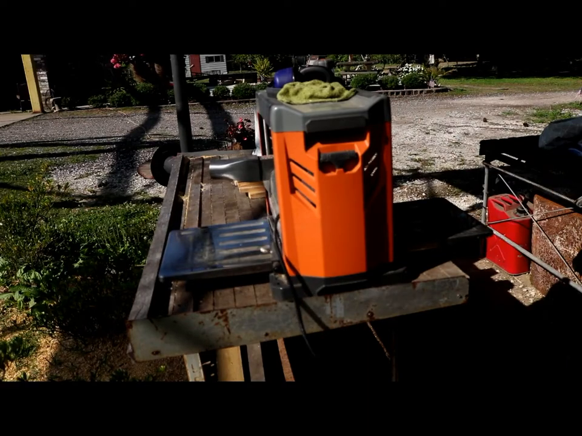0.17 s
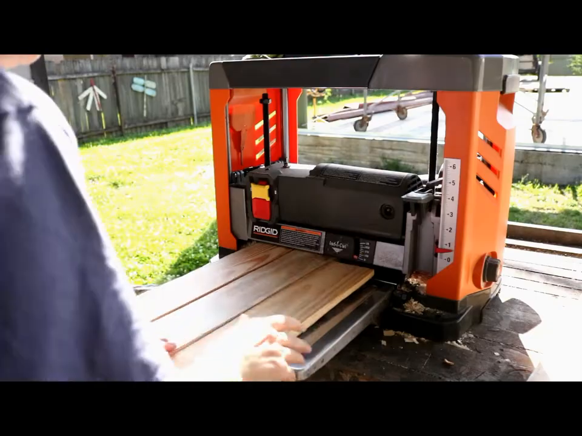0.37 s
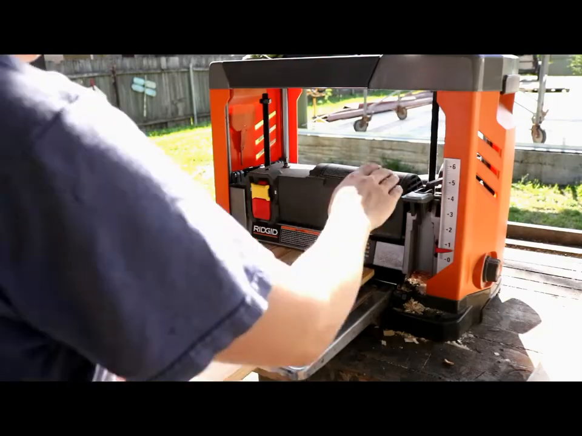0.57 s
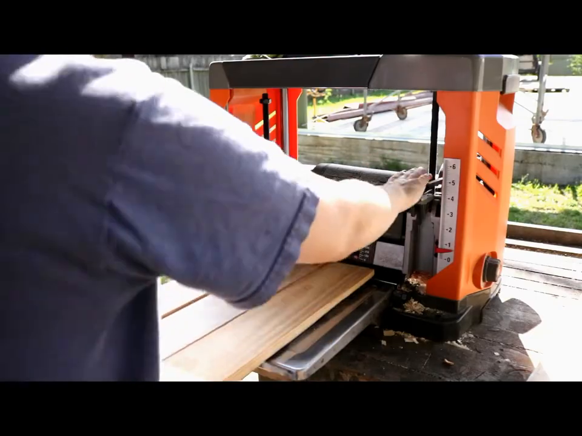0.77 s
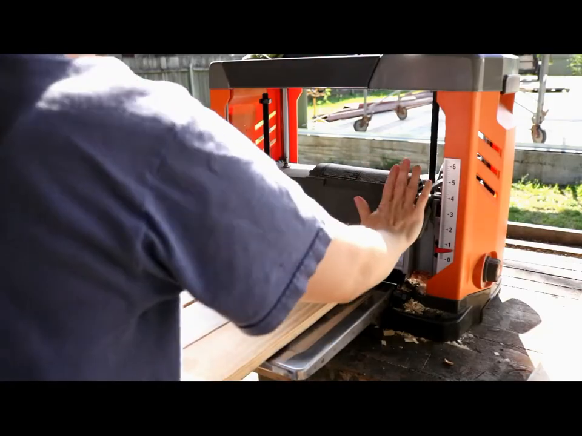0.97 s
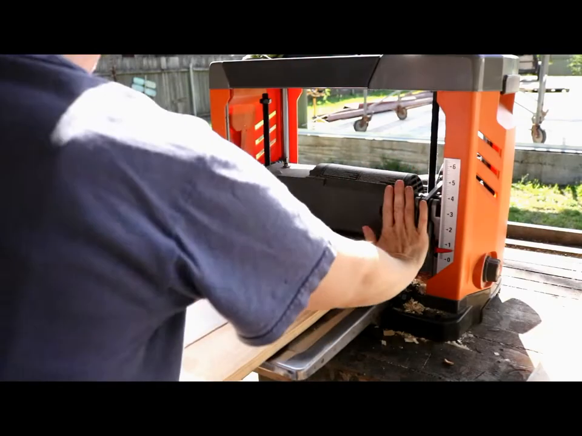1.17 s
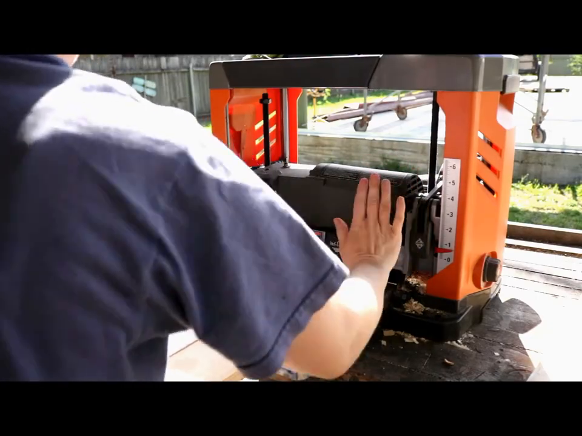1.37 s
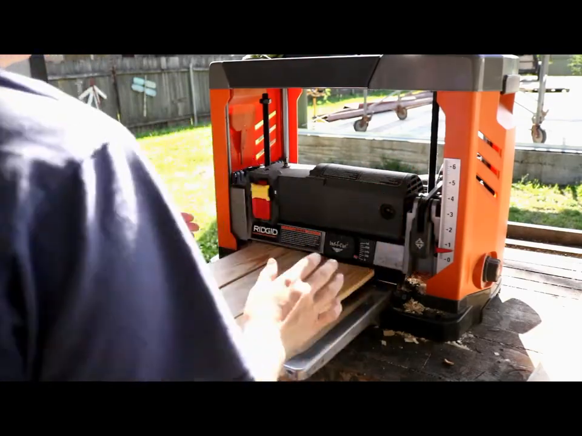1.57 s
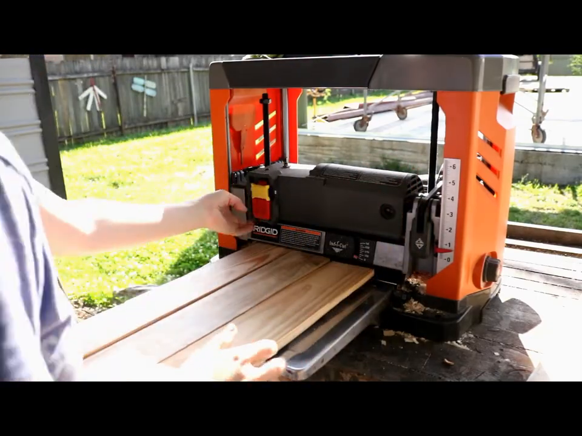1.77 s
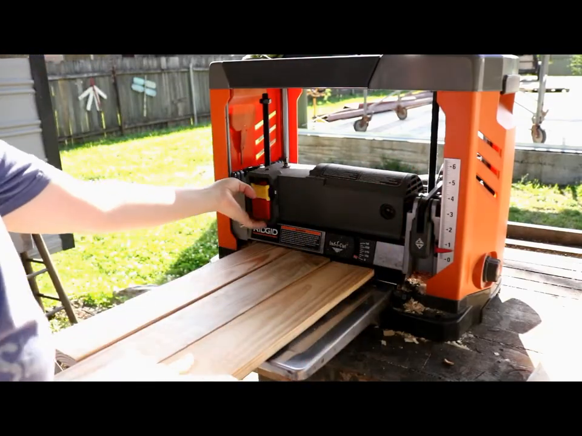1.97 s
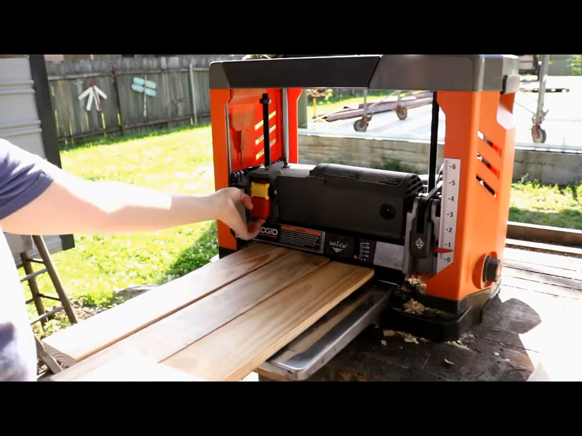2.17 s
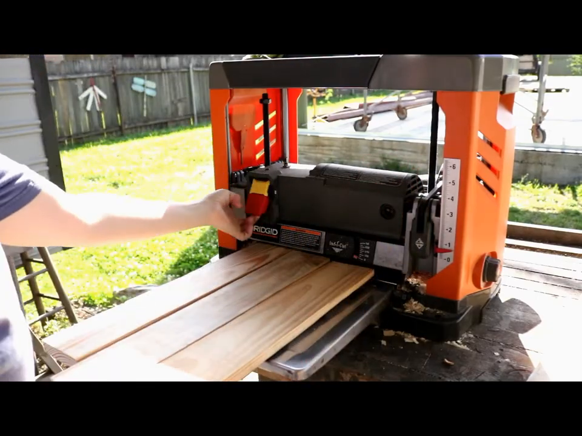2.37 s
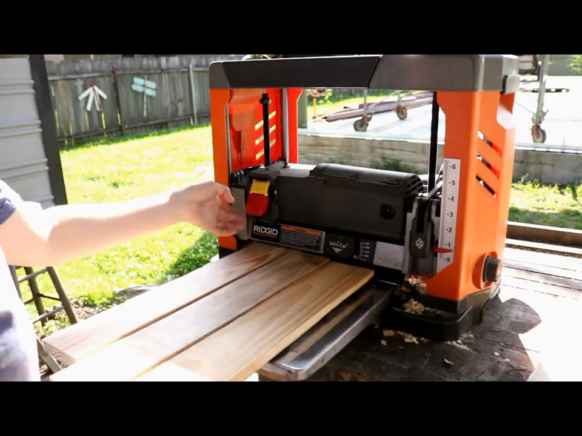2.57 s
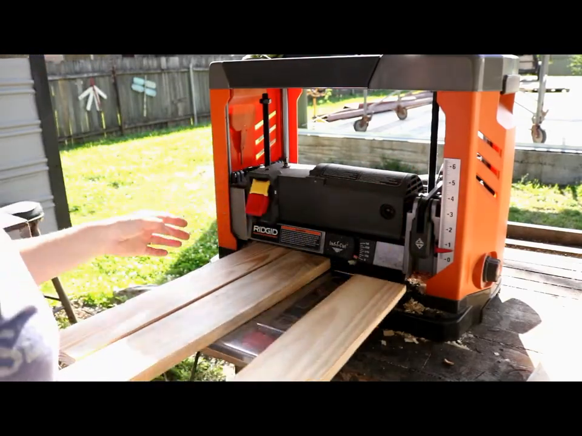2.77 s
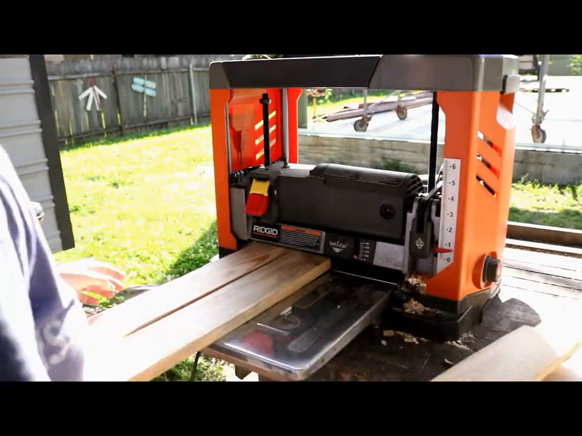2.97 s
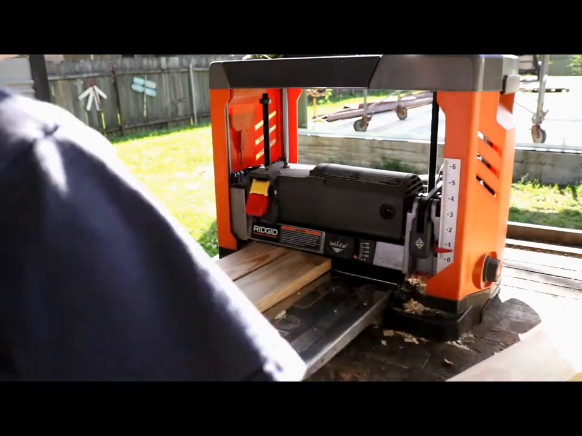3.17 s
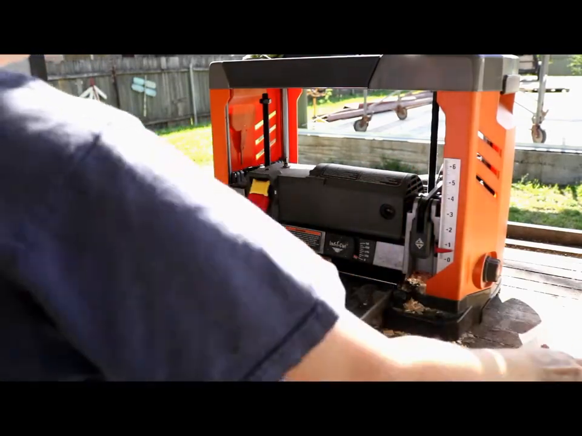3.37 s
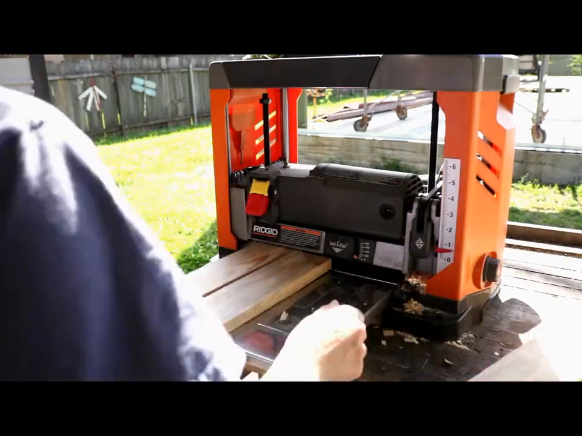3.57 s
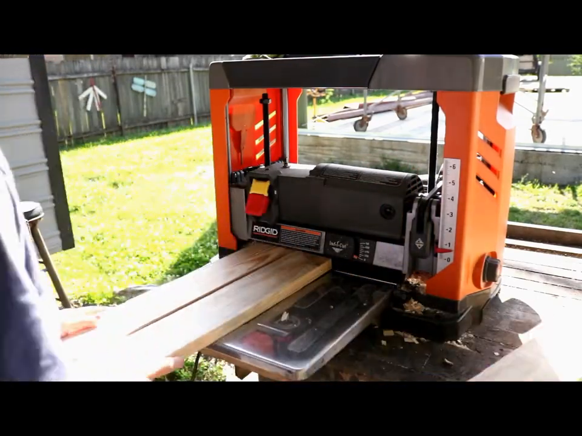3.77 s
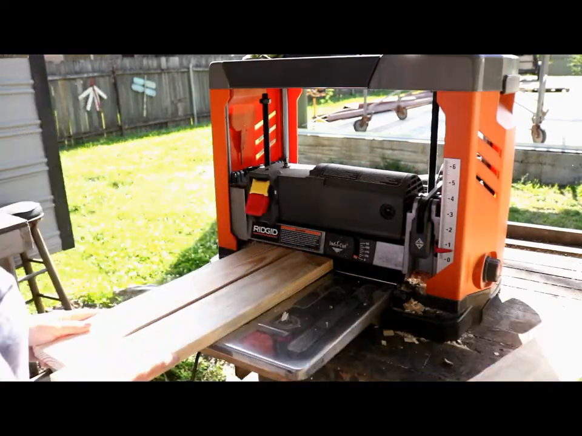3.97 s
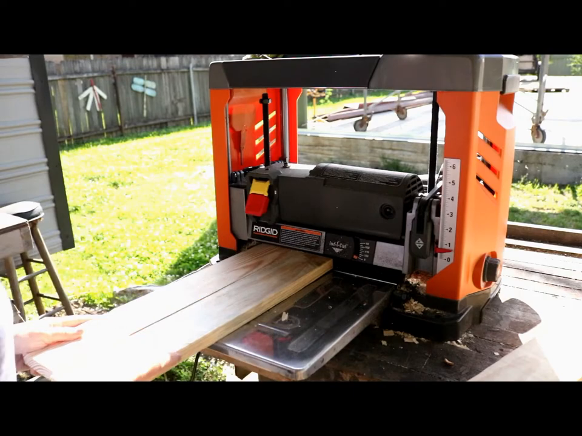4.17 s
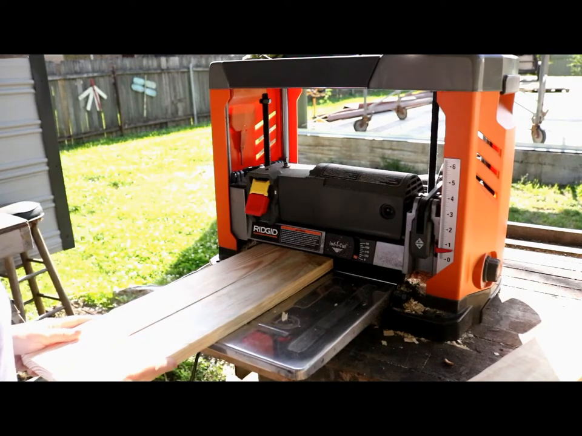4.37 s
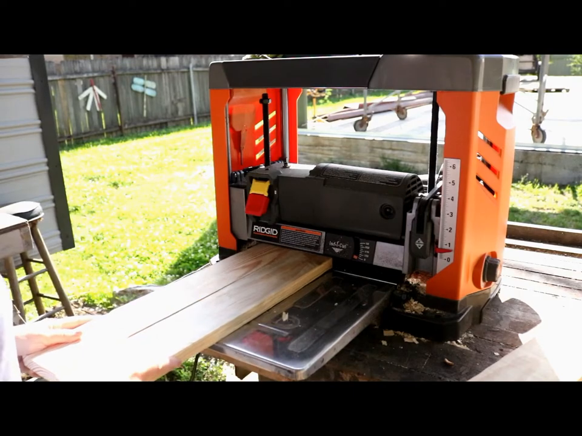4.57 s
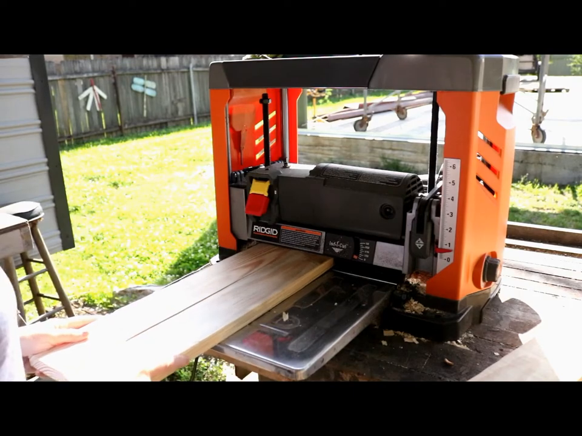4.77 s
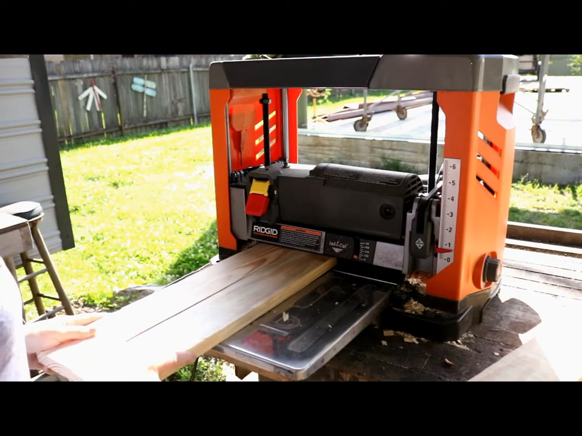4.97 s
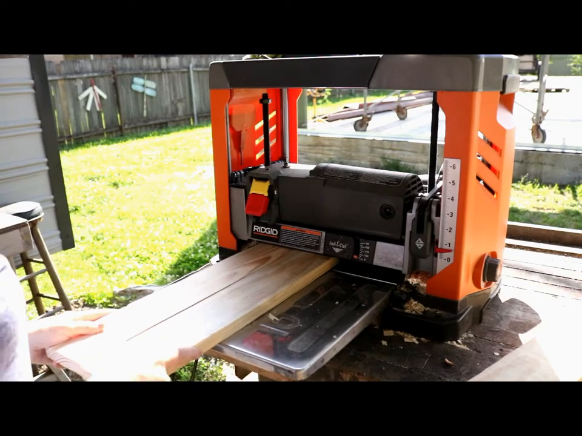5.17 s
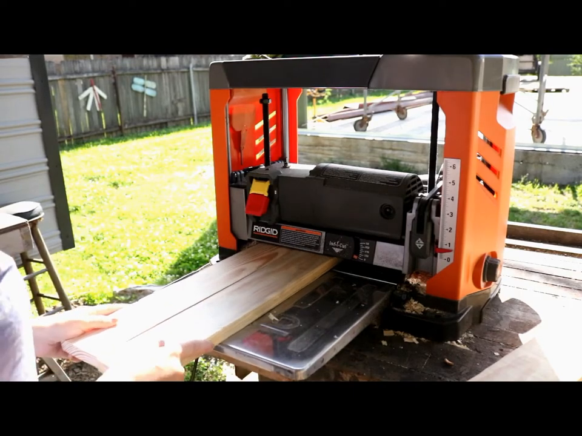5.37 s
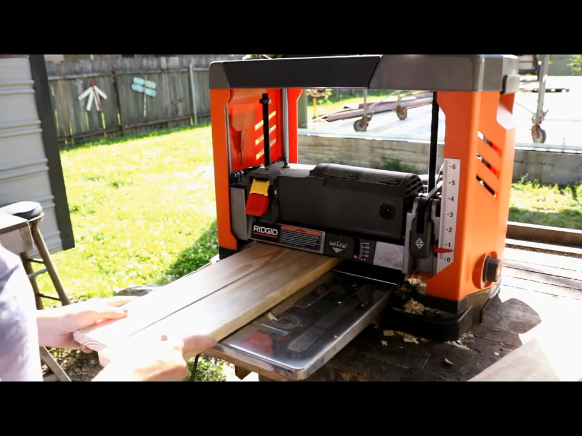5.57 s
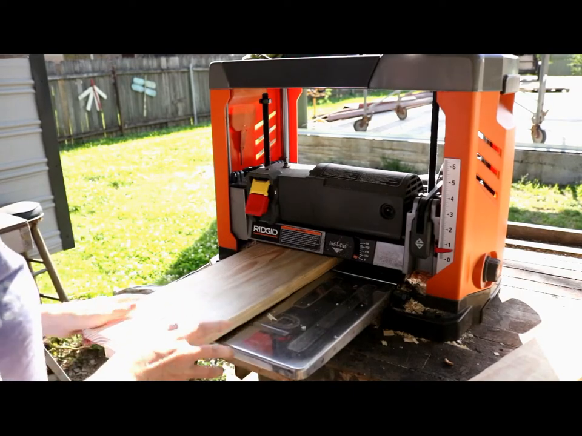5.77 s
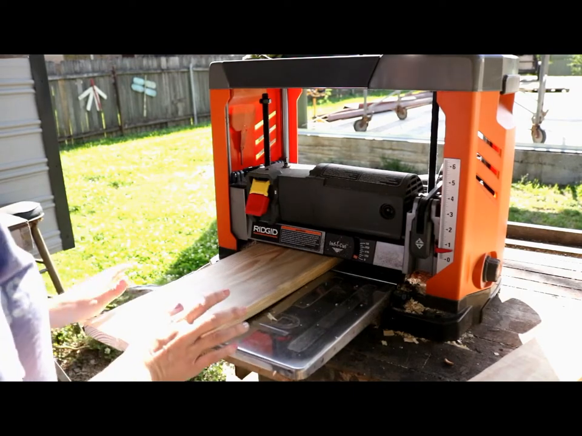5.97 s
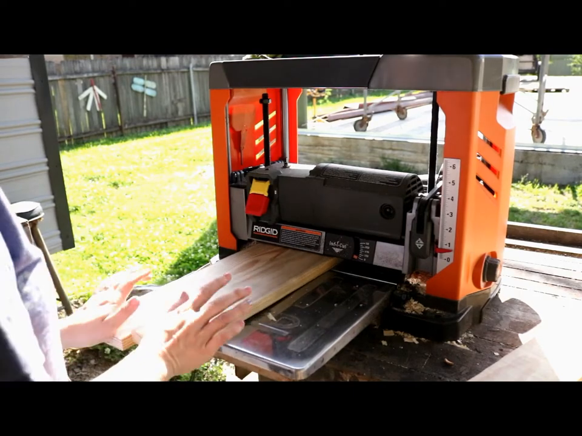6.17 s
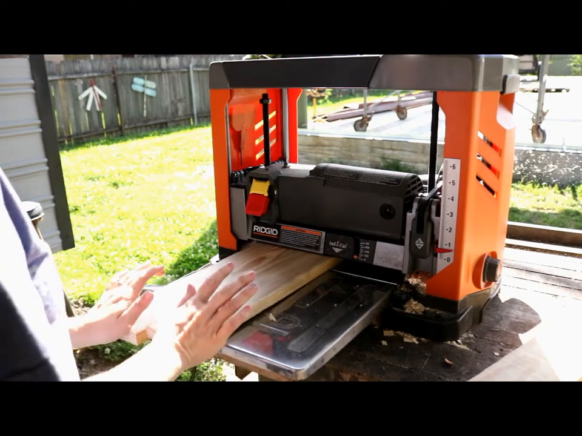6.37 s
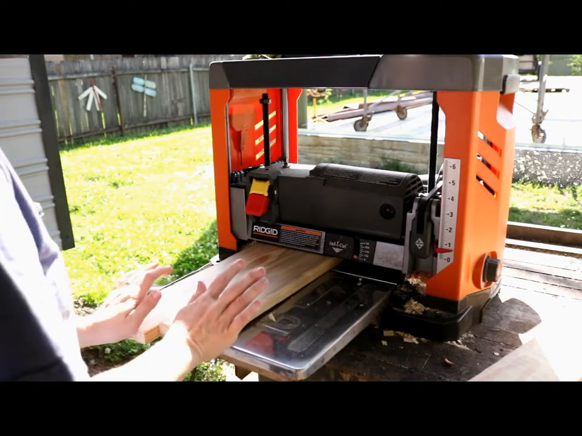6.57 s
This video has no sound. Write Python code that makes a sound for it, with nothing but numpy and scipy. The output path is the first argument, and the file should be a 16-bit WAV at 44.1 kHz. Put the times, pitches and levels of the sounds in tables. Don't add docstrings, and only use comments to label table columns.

```python
import sys
import numpy as np
from scipy import signal
from scipy.fft import rfft, irfft, next_fast_len
from scipy.io import wavfile
from scipy.ndimage import uniform_filter1d, map_coordinates

SR = 44100
rng = np.random.default_rng(int(sys.argv[2]) if len(sys.argv) > 2 else 0)


def store_wav(level_fs):
    pcm = np.round(np.clip(np.atleast_2d(level_fs), -1, 1) * 32767)
    wavfile.write(sys.argv[1], SR, pcm.T.astype(np.int16))


def convert_level_to_amplitude(level_db):
    exponent = np.asarray(level_db, float) / 20
    return 10 ** exponent


N = 291501
TIME = np.arange(N) / SR
SLAP_S, SWITCH_S, BITE_S = 1.2, 2.32, 6.225
MAINS_PULSE_HZ = 120

# (shortfall at the switch [Hz], time constant [s])
RUN_UP = [(364.5, .196), (434.6, .586)]


def fan_speed():
    full_hz, load_s, sag_hz_per_s, sag_lag_s = 876.1, 6.17, 227, .112
    gap = sum(hz * np.exp(-since(SWITCH_S) / lag) for hz, lag in RUN_UP)
    loaded_s = since(load_s)
    sag = sag_hz_per_s * (loaded_s - sag_lag_s * (1 - np.exp(-loaded_s / sag_lag_s)))
    return full_hz - gap - sag


BELT_SLIP = .01947


def shafts():
    beat_turns = .6
    on = np.clip(since(SWITCH_S + .008) / .005, 0, 1)
    fan = np.cumsum(fan_speed() * on) / SR
    knife = (fan * (1 - BELT_SLIP) + beat_turns) / 2
    return on, fan, knife


# (pitch [Hz], level [dB])
FAN_TONE = [(150, -52), (480, -39), (560, -22.5), (640, -23), (764, -16.5), (815, -14.5), (846, -16),
            (870, -16)]
FAN_SECOND = [(440, -33), (1117, -26), (1264, -35.5), (1590, -29.5), (1610, -39.5), (1668, -39),
              (1714, -26), (1750, -29.5)]
FAN_THIRD = [(765, -54), (1896, -39), (2010, -28.5), (2100, -35.5), (2380, -37.5), (2446, -46), (2591, -36),
             (2625, -40)]
FAN_ORDERS = [.33, .4125, .5, .661, .74, 4, 5.29, 5.43, 6, 10.58]
FAN_ORDER_DB = [-50, -46, -50, -41.5, -52, -45, -49.5, -64, -57, -70]


def fan_tones(fan):
    hz = fan_speed()
    x = tone(fan, along(FAN_TONE, hz), pan_db=-2.0, lead=0.48, flutter_db=0.5, rate=20)
    x += tone(2 * fan, along(FAN_SECOND, 2 * hz * 0.5), pan_db=-1.4, lead=0.63, flutter_db=0.86) * 0 \
        + tone(2 * fan, along(FAN_SECOND, 2 * hz), pan_db=-1.4, lead=0.63, flutter_db=0.86)
    x += tone(3 * fan, along(FAN_THIRD, 3 * hz), pan_db=12.5, lead=0.78, flutter_db=1.0, rate=25)
    for order, db in zip(FAN_ORDERS, FAN_ORDER_DB):
        x += tone(order * fan, db, lead=rng.normal(0, 0.44), flutter_db=2.5)
    return x


# (pitch [Hz], level [dB])
KNIFE_TONE = [(60, -58.5), (240, -36), (310, -29.5), (360, -22), (390, -25), (418, -36.5), (427, -28.5),
              (431, -25)]
KNIFE_SECOND = [(200, -51), (395, -27), (475, -45), (620, -17), (717, -25), (750, -22.5), (780, -28),
                (860, -31)]
# (multiple of the knife rate [1], level [dB])
HEAD_ORDERS = [(1 / 3, -53), (3, -42)]


def cutter_head_tones(knife):
    hz = fan_speed() * (1 - BELT_SLIP) / 2
    x = tone(knife, along(KNIFE_TONE, hz), flutter_db=0.8)
    x += tone(2 * knife, along(KNIFE_SECOND, 2 * hz), pan_db=-1.5, lead=0.26)
    return x + sum(tone(order * knife, db, flutter_db=0.0) for order, db in HEAD_ORDERS)


# (pitch [Hz], level [dB])
WHINE = [(1450, -30), (1750, -14.5), (2150, -15), (2330, -21), (2600, -14.5), (2900, -28), (3060, -21),
         (3350, -27)]
# (pitch [Hz], level [dB])
SQUEAL = [(1850, -38), (2150, -28), (2900, -29), (3320, -17), (3500, -50), (4650, -43), (7800, -51.5),
          (9300, -61)]


def armature(fan):
    slot_order, bar_order = 5.33, 10.58
    bar_drag_hz, inrush_s = 238, 0.22
    whine_ends_s = 2.745
    throb = 1 + 0.49 * np.sin(2 * np.pi * MAINS_PULSE_HZ * TIME)
    slot_hz = slot_order * fan_speed()
    slot_turns = np.cumsum(slot_hz + 60 * wobble(130)) / SR
    whine = tone(slot_turns, along(WHINE, slot_hz), pan_db=2.0, lead=0.6, flutter_db=1.37, rate=60)
    bar_hz = bar_order * fan_speed() - bar_drag_hz * np.exp(-(since(SWITCH_S) / inrush_s) ** 2)
    bar_turns = np.cumsum(bar_hz + 90 * wobble(110)) / SR
    squeal = tone(bar_turns, along(SQUEAL, bar_hz), flutter_db=-3.0, rate=45)
    return throb * (whine * convert_level_to_amplitude(-500 * since(whine_ends_s)) + squeal)


# (frequency [Hz], level [dB])
HUM_ORDERS = [(120, -22.5), (240, -2), (360, -7)]
# (start [s], length [s], level [dB])
HUM_SWELLS = [
    (2.36, 0.12, -22.5),
    (2.48, 0.15, -36.5),
    (2.92, 0.16, -35),
    (3.2, 0.089, -43),
]


def hum():
    partials = sum(tone(hz * TIME, db, flutter_db=2.5) for hz, db in HUM_ORDERS)
    return swells(HUM_SWELLS, blunt=0.93) * partials


def motor():
    duck_db, loaded_s = -10, 0.15
    on, fan, knife = shafts()
    ducked = convert_level_to_amplitude(duck_db * (1 - np.exp(-since(BITE_S) / loaded_s)))
    return on * ducked * (fan_tones(fan) + cutter_head_tones(knife) + armature(fan)) + hum()


# (time [s], level [dB])
DRAUGHT = [(2.33, -27), (2.35, -42), (2.39, -32), (2.4, -27), (2.42, -31.5), (2.58, -37.5), (2.59, -38.5),
           (2.63, -31), (2.64, -28), (2.71, -31), (3.11, -33), (3.14, -37.5), (4.13, -32), (4.22, -34.5),
           (5.44, -36), (5.46, -35.5), (5.5, -37.5), (6.2, -36)]
# (frequency [Hz], level [dB per Hz])
ROAR = [(60, -37), (150, -16.5), (350, -11.5), (800, 0), (1100, -4.5), (1500, -6), (2000, -6), (2800, -39)]
RUSH = [(1200, -31.5), (1900, -14), (2200, -1), (2500, -5.5), (3050, 0.5), (3400, -11), (3700, -9.5),
        (4800, -18), (6000, -41.5)]
VENT = [(3700, -17.5), (4100, -0.5), (4300, 5.5), (4500, -21), (5000, -38)]
HISS = [(2650, -23), (4500, -2), (4850, -3), (6220, -3.5), (8290, -8), (9020, -9), (14200, -32),
        (16000, -52)]
# (frequency [Hz], likeness [1])
ALIKE = [(60, 0.77), (150, 0.94), (400, 1), (950, 0.91), (2400, 0.65), (6000, 0.47), (15000, 0.79)]


def air():
    labour_db, labour_s = 3.5, 0.54
    on, fan, knife = shafts()
    times, levels = np.transpose(DRAUGHT)
    draught_db = np.interp(TIME, times, levels)
    calm_db = draught_db[-1]
    swing_db = draught_db - calm_db
    shared_db = 0.12 * wobble(9) + calm_db
    spark_depth = .5 * np.exp(-np.abs(TIME - SWITCH_S) / 0.16)
    sparks = 1 + spark_depth * np.sin(2 * np.pi * MAINS_PULSE_HZ * TIME)
    chop = 1 + 0.43 * np.sin(2 * np.pi * knife) + 0.17 * np.sin(2 * np.pi * fan)
    roar_db = 6 + 0.9 * swing_db + labour_db * np.exp(-since(SWITCH_S) / labour_s)
    roar = convert_level_to_amplitude(roar_db + shared_db) * rush(ROAR, ALIKE, patchy_db=1.5)
    blow = convert_level_to_amplitude(5.5 + 0.9 * swing_db + shared_db) * chop * rush(RUSH, ALIKE, patchy_db=0.06)
    vent = convert_level_to_amplitude(-4.5 + 1.45 * swing_db + shared_db) * rush(VENT, ALIKE, patchy_db=-0.4)
    hiss = convert_level_to_amplitude(-1.5 + 0.66 * swing_db + shared_db) * rush(HISS, ALIKE, patchy_db=1.33)
    return on * sparks * (roar + blow + vent + hiss)


def board_blows(index, size):
    fade = convert_level_to_amplitude(-60 * TIME[:800] / 0.036)
    chatter = fade * rng.standard_normal((3, 2, 800)) * [[1], [.4]]
    stage = (TIME - 6.25) / .16 - np.arange(3)[:, None]
    feed = np.clip(1 - np.abs(stage), 0, 1) ** .5
    strikes = np.diff(index, prepend=index[0]) * size * feed
    blows = 0
    for strike, (mid, side) in zip(strikes, chatter):
        blows = blows + signal.fftconvolve(strike[None], [mid + side, mid - side], axes=1)[:, :N]
    return blows


# (frequency [Hz], width [Hz], level [dB])
BOARD = [(560, 67, -5.5), (1210, 300, 1.5), (1660, 300, 5), (2190, 260, -4.5)]
# (time [s], level [dB], T60 [s])
JOLTS = [
    (6.231, -1.5, 0.11),
    (6.374, -3, 0.13),
    (6.458, -0.5, 0.047),
    (6.571, -5, 0.071),
]
# (rest level over the bite [dB], drift [dB per s], jolt level [dB])
RINGS = [
    (-10, 5, 4.5),
    (-5, -64, -4),
    (-13.5, -23, -4.5),
]
# (frequency [Hz], level [dB per Hz])
CHIPS = [(3000, -28), (5000, -2), (8000, -5), (12000, -12.5), (15500, -22), (16500, -63)]


def cutting():
    bite_db, bite_rise_s = -21, .04
    on = 1. * (TIME > BITE_S)

    def level(x):
        return x / np.sqrt(np.mean(x ** 2) / np.mean(on))

    def ring(force, hz, width):
        once = resonances(force, [(hz, width, 0)])
        return level(resonances(once, [(hz, 2 * width, 0)]))

    jolt = sum(convert_level_to_amplitude(db - 60 * since(s) / t60) * np.clip(since(s) / 0.01, 0, 1) for s, db, t60 in JOLTS)
    table, knife, spray = (convert_level_to_amplitude(rest_db + drift_db * since(BITE_S)) + convert_level_to_amplitude(jolt_db) * jolt
                           for rest_db, drift_db, jolt_db in RINGS)
    turn = shafts()[2] / 3 + .3
    index = turn.astype(int)
    size = convert_level_to_amplitude(1.4 * rng.standard_normal(index[-1] + 1))[index] * on
    tear = size * np.exp(-(turn % 1) / 0.97)
    force = level(board_blows(index, size)) + 0.38 * level(tear * rng.standard_normal((2, N)))
    wood = level(resonances(force, BOARD))
    metal = table * ring(force, 3040, 700) + knife * ring(force, 4300, 260)
    chips = spray * level(tear * rush(CHIPS, ALIKE, patchy_db=-2.5))
    rise = np.clip(.4 + since(BITE_S) / bite_rise_s, 0, 1)
    return convert_level_to_amplitude(bite_db) * rise * (wood + metal + chips)


# (frequency [Hz], phase [rad])
LEAD = [(300, .2), (900, 0.18), (6000, 0.23), (8500, 1.44), (10500, 1.8), (16000, 2.5)]


def ports(x):
    return filtered(x, lambda hz: np.exp(1j * along(LEAD, hz) * np.array([[.5], [-.5]])))


def thunk(t):
    hz, db, t60 = 800, -3, .05
    turns = hz * t * (1 - 4 * t)
    return convert_level_to_amplitude(db - 60 * t / t60) * (1 - np.exp(-t / 0.0079)) * np.sin(2 * np.pi * turns)


# (time [s], crack level [dB], body level [dB], body T60 [s], snap level [dB])
HITS = [
    (.468, -48, -44, 0.096, -56),
    (1.1928, 0, -8.5, 0.071, -16.5),
    (1.867, -35, -44, .03, -41),
    (2.3205, -3.5, -6, 0.019, -3.5),
    (2.3264, -18.5, -14.5, 0.015, -11.5),
    (2.401, -18, -13.5, 0.066, -33.5),
    (3.414, -20.5, -12.5, 0.036, -55),
    (6.575, -15, -12, 0.034, -47),
]
# (frequency [Hz], width [Hz], level [dB])
CRACK = [(1790, 1230, -4), (2800, 870, 0.5), (4300, 1170, -9)]
BODY = [(465, 250, -9), (875, 440, -2), (1440, 230, 1), (2060, 540, -7.5)]
SNAP = [(6660, 2600, -1)]
# (frequency [Hz], T60 [s])
WALLS = [(300, 1), (1000, 0.29), (3000, 0.15), (10000, 0.2)]


def hits():
    crack_s, snap_s, thunk_at_s = 0.014, 0.012, 2.329
    soft_hz = 11000
    t = np.arange(SR // 4) / SR
    x = np.zeros((3, 2, N + SR))
    for s, crack_db, body_db, body_s, snap_db in HITS:
        fades = np.array([crack_db + 11.5 - 60 * t / crack_s,
                          body_db + 11.0 - 60 * t / body_s,
                          snap_db + 3 - 60 * t / snap_s])
        bursts = convert_level_to_amplitude(fades) * rng.standard_normal((3, len(t)))
        bursts[::2, 0] = -5 * convert_level_to_amplitude(fades[::2, 0])
        hz, u, z = signal.stft(rng.standard_normal((2, len(t))), SR, nperseg=256)
        tail = signal.istft(z * convert_level_to_amplitude(-60 * u / along(WALLS, hz)[:, None]), SR, nperseg=256)[1]
        tail = tail[None] / np.linalg.norm(tail[0])
        echo = signal.fftconvolve(bursts[:, None], tail, axes=2)[..., :len(t)]
        x[..., round(s * SR):][..., :len(t)] += bursts[:, None] + convert_level_to_amplitude(-7.5) * echo
    knocks = sum(resonances(part[:, :N], modes) for part, modes in zip(x, (CRACK, BODY, SNAP)))
    knocks[:, round(thunk_at_s * SR):][:, :len(t)] += thunk(t)
    return filtered(knocks, lambda f: 1 / (1 + 1j * f / soft_hz) ** 2) * convert_level_to_amplitude([[2.2], [-.2]])


# (start [s], length [s], level [dB])
SLEEVE = [
    (.38, 0.15, -39),
    (.455, 0.074, -45),
    (1.2, 0.27, -44),
]
# (frequency [Hz], level [dB per Hz])
CLOTH = [(300, -14), (700, -1), (1100, -6), (1600, -1), (3000, -12), (8000, -26), (14000, -50)]


def sleeve():
    return swells(SLEEVE) * convert_level_to_amplitude(2.7 * wobble(119)) * rush(CLOTH, ALIKE, patchy_db=4.5)


# (start [s], length [s], first pitch [Hz], last pitch [Hz], level [dB])
BIRD = [
    (.65, 0.088, 2600, 2740, -55),
    (1.01, .18, 2390, 2970, -57),
    (1.46, .21, 2160, 3000, -52),
]
SPARROW = [
    (1.115, 0.086, 4500, 3130, -51),
    (1.69, 0.041, 4300, 4000, -59),
]


def song(notes, warble_hz, pace):
    hz = 0
    for s, length, from_hz, to_hz, _ in notes:
        slide = to_hz + (from_hz - to_hz) * np.exp(-3.2 * since(s) / length)
        hz = hz + slide * (np.abs(TIME - s - length / 2) < length)
    arch = swells([(s, length, db) for s, length, *_, db in notes], blunt=0.34)
    turns = np.cumsum(hz + warble_hz * wobble(pace)) / SR
    return arch * tone(turns, 0, pan_db=14, lead=0.98, flutter_db=1.5, rate=94)


def slap_duck_db():
    dip_db, recover_s = -13, 0.069
    age = since(SLAP_S) / recover_s
    return dip_db * 2 * age * np.exp(1 - 2 * age)


# (frequency [Hz], level [dB per Hz])
RUMBLE = [(15, -56), (25, -25), (52, -7.5), (64, -4), (78, -1.5), (92, -9.5), (124, -3.5), (184, -15.5),
          (231, -10), (246, -9.5), (262, -31), (300, -16), (390, -30.5), (660, -120)]
# (frequency [Hz], level over the rumble [dB])
DRONE = [(69, -3), (118, -13.5), (240, -15.5)]
# (start [s], length [s], level [dB])
GUSTS = [
    (3.1, 0.26, -46),
    (3.4, 0.34, -52),
    (4.85, 0.38, -55),
    (5.58, 0.18, -42.5),
    (5.8, 0.45, -59),
]
# (frequency [Hz], likeness [1])
YARD_ALIKE = [(60, 0.98), (180, 0.99), (550, 0.85), (1650, -0.088), (4970, 0.14), (15000, -0.59)]


def traffic():
    traffic_db, under_motor_db, settle_s = -44, -34.5, 0.91
    under = 1 - np.exp(-since(SWITCH_S) / settle_s)
    far = convert_level_to_amplitude(traffic_db + slap_duck_db() + under_motor_db * under + (0.2 + 2 * under) * wobble(5.8))
    rumble = (far + swells(GUSTS, blunt=1.3)) * rush(RUMBLE, YARD_ALIKE, patchy_db=0.5)
    drone = sum(tone(np.cumsum(hz + 1.72 * wobble(6.7)) / SR, db, flutter_db=4.0, rate=10)
                for hz, db in DRONE)
    return rumble + far * drone


# (frequency [Hz], level [dB per Hz])
BREEZE = [(88, -38), (150, -10.5), (235, -12.5), (391, -13), (439, -14), (1830, -16), (2180, -21),
          (2810, -20), (3350, -22), (16000, -42)]


def breeze():
    gain = convert_level_to_amplitude(-41.5 + 0.067 * slap_duck_db()) * (TIME < SWITCH_S + .05)
    return gain * rush(BREEZE, YARD_ALIKE, patchy_db=0.8)


def yard():
    birds = song(BIRD, warble_hz=70, pace=61) + song(SPARROW, warble_hz=203, pace=300)
    return sleeve() + birds + traffic() + breeze()


def tone(turns, db, pan_db=0, lead=0, flutter_db=1, rate=14):
    ears, coarse = np.array([[.5], [-.5]]), TIME[::32]
    knots = rng.standard_normal((3, int(N * rate / SR) + 4))
    curves = [map_coordinates(row, [coarse * rate]) for row in knots]
    flutter = convert_level_to_amplitude(pan_db * ears + flutter_db * (curves[0] + 1.44 * np.array(curves[1:])))
    gain = np.array([np.interp(TIME, coarse, g) for g in flutter])
    swing = np.exp(2j * np.pi * (turns % 1).astype(np.float32))
    return np.sqrt(2) * convert_level_to_amplitude(db) * gain * (swing * np.exp(1j * lead * ears)).imag


def rush(spectrum, alike, patchy_db):
    z = signal.stft(rng.standard_normal((2, N)), nperseg=512)[2]
    field = uniform_filter1d(rng.standard_normal(z.shape[1:]), size=6, axis=0)
    field = uniform_filter1d(field, size=10, axis=1)
    pair = signal.istft(z * convert_level_to_amplitude(patchy_db * unit(field)), nperseg=512)[1][:, :N]

    def response(hz):
        turn = np.arccos(np.clip(along(alike, hz), -1, 1)) / 2
        return convert_level_to_amplitude(along(spectrum, hz)) * [np.cos(turn), np.sin(turn)]

    mid, side = filtered(pair, response)
    return unit(np.array([mid + side, mid - side]))


def resonances(x, modes):
    def response(f):
        return sum((-1) ** k * convert_level_to_amplitude(db) * 1j * f * w / (c * c - f * f + 1j * f * w)
                   for k, (c, w, db) in enumerate(modes))
    return filtered(x, response)


def filtered(x, response):
    m = next_fast_len(N + SR // 2)
    return irfft(rfft(x, m) * response(np.fft.rfftfreq(m, 1 / SR)), m)[..., :N]


def swells(rows, blunt=0.38):
    gain = 0
    for s, length, db in rows:
        arch = np.abs(np.sin(np.pi * np.clip((TIME - s) / length, 0, 1))) ** blunt
        gain = gain + convert_level_to_amplitude(db) * arch * (since(s) < length)
    return gain


def wobble(rate):
    coarse = TIME[::32]
    knots = rng.standard_normal(int(N * rate / SR) + 4)
    return np.interp(TIME, coarse, map_coordinates(knots, [coarse * rate]))


def along(points, hz):
    f, v = np.transpose(points)
    return np.interp(np.log(hz + 1), np.log(f + 1), v)


def since(s):
    return np.maximum(TIME - s, 0)


def unit(x):
    return x / np.sqrt(np.mean(x ** 2) + 1e-20)


def scene():
    return motor() + ports(air() + cutting()) + hits() + yard()


def low_pass(x):
    return signal.sosfilt(signal.butter(12, 15810, fs=SR, output="sos"), x)


def record(dry):
    x = dry * np.clip((TIME - .247) / 0.00088, 0, 1)
    x = x / (1 + np.abs(x / 1.02) ** 8) ** (1 / 8)
    x = filtered(x, lambda hz: 1 / (1 + (hz / 15900) ** 60) / (1 + (30 / (hz + 1)) ** 4))
    return low_pass(x)


dry = scene()
out = record(dry)
store_wav(out)
```